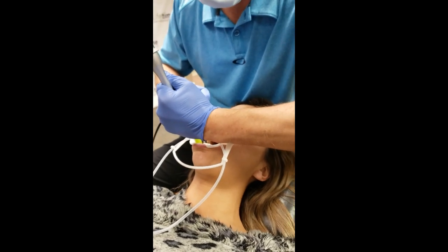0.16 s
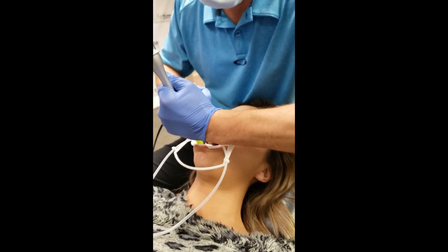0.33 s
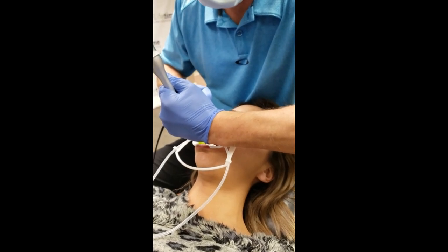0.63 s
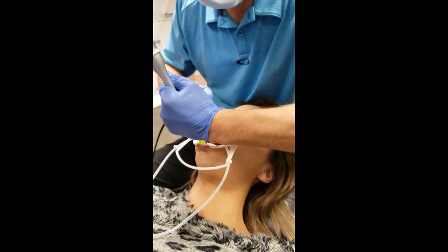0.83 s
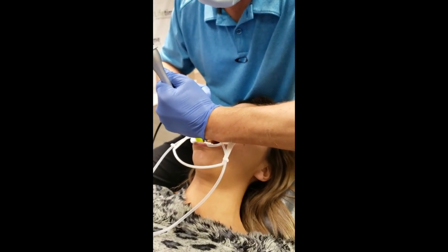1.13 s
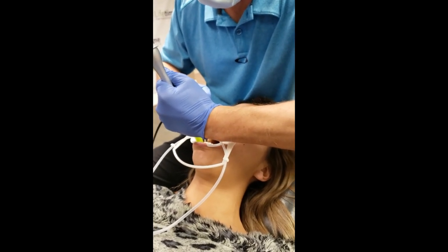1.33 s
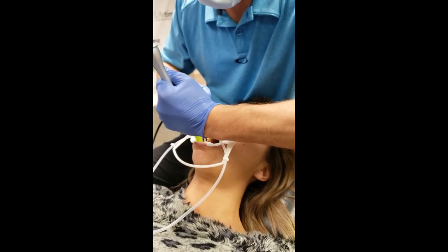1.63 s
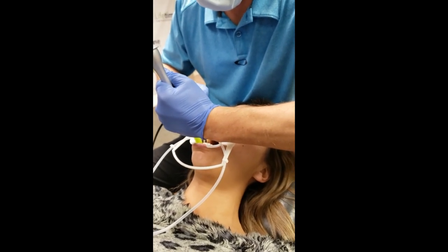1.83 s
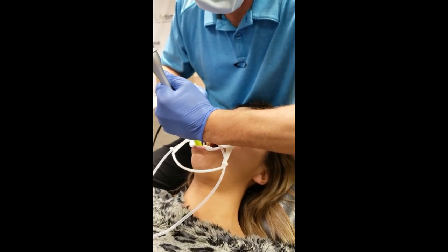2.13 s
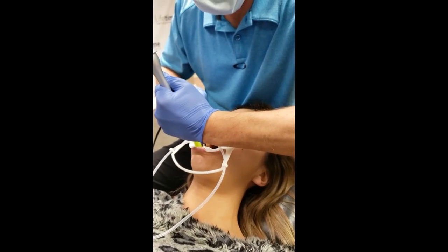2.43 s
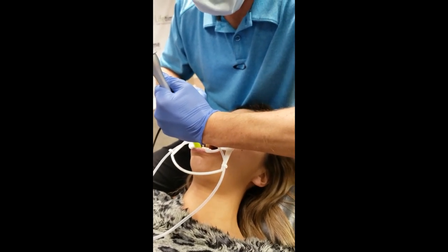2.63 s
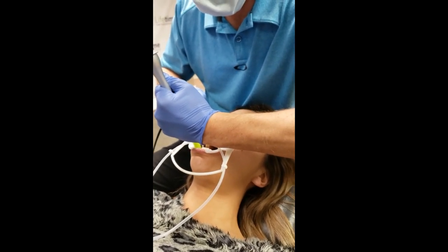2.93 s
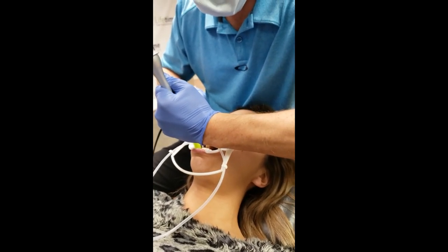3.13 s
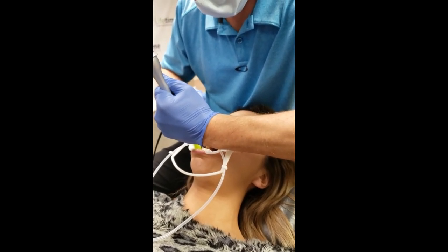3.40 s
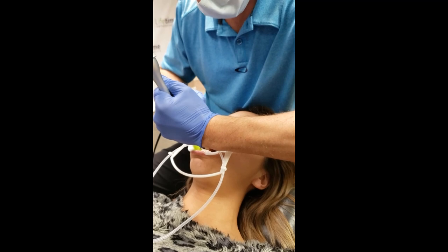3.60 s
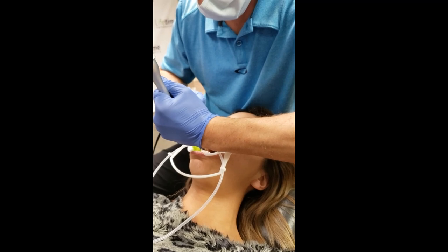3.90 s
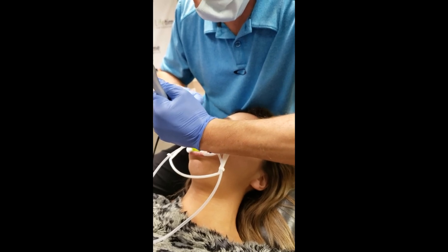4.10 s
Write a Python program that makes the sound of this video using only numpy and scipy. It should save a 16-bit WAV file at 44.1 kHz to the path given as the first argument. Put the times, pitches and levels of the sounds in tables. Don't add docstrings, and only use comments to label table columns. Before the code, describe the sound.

A dental suction hose draws air from a patient's mouth with a thin, bright hiss over a weaker hollow roar. After about a second water reaches the tip and it crackles and spits sharp ticks, busiest around two seconds. Then the jet opens into a stronger, sizzling hiss until the end. Stereo phone at arm's length, with barely audible hand bumps.

```python
import sys
import numpy as np
from scipy import signal
from scipy.fft import rfft, irfft, dct
from scipy.io import wavfile
from scipy.ndimage import uniform_filter1d

SR = 44100
rng = np.random.default_rng(int(sys.argv[2]) if len(sys.argv) > 2 else 0)


def wav_record(signal):
    frames = np.transpose(np.atleast_2d(signal))
    bounded = np.clip(frames, -1, 1)
    quanta = np.round(bounded * 32767).astype(np.int16)
    wavfile.write(sys.argv[1], SR, quanta)


def boost_factor(decibels):
    exponent = np.asarray(decibels, float) / 20
    return 10 ** exponent


N = 187510

# t/s, hose level/dB, tip jet level/dB
AIR_LEVELS = [(0, -38, -29.5), (.5, -37, -30.5), (.6, -34.5, -27.5), (.74, -36, -29), (.89, -38.5, -32),
              (1.24, -37.5, -30.5), (1.29, -36.5, -30.5), (1.6, -36.5, -31), (1.98, -36, -27.5),
              (2.5, -36, -29), (2.64, -35.5, -23.5), (2.87, -38, -25), (2.92, -40, -26), (3.14, -42, -25),
              (3.3, -41, -24.5), (3.86, -41.5, -26.5), (3.96, -42, -24.5), (4.25, -44, -25.5)]
# t/s, share of tip under water/0-1, mouth widened/0-1, crackle spread/dB, small drops/(1/s)
WATER = [
    (0, 0.2, 0.08, 4, 6),
    (.95, 0.02, 0.1, 2, 13),
    (1.15, 0.19, 0.33, 4, 45),
    (1.45, 0.84, 0.3, 4, 55),
    (2.6, 0.88, 0.1, 2, 35),
    (2.66, 0.95, 0.4, 2.5, 5),
    (2.85, 0.92, 0.43, 3, 5),
    (2.9, 0.92, 1, 3, 4),
    (3.5, 0.99, 0.86, 0, 3),
    (4.25, 1, 1, 2, 4),
]
# t/s, peak level/dB
LARGE_DROPS = [(0.6249, -16), (0.9013, -14.5), (1.0839, -24), (1.117, -20), (1.1767, -23), (1.204, -15),
               (1.293, -17), (1.483, -16.5), (1.6324, -15), (1.661, -15), (1.6893, -16), (1.702, -7),
               (1.7295, -18), (1.7809, -16), (1.817, -18), (1.8366, -11), (1.853, -20), (1.8788, -10.5),
               (1.9101, -15), (1.9707, -15), (1.9845, -13), (2.0038, -13.5), (2.0681, -12.5), (2.2226, -6),
               (2.3407, -17), (2.4912, -13.5), (2.5247, -14), (2.554, -14.5), (2.615, -15), (3.2041, -14.5)]
# t/s, jet gain/dB
GULPS_OF_WATER = [
    (1.05, 2.5),
    (1.41, 0),
    (1.99, 1.5),
    (2.165, 1.5),
    (2.21, -2),
    (2.285, 3.5),
    (2.335, 5),
    (2.54, 2.5),
    (2.875, 3),
    (3.58, 2.5),
]
# t/s, peak level/dB
HAND_BUMPS = [(0.614, -53), (0.77, -56), (1.177, -62), (1.43, -57), (1.481, -47), (1.509, -52),
              (1.545, -58), (1.699, -55), (1.97, -58), (2.217, -52.5), (2.545, -60), (2.708, -50),
              (3.412, -57), (3.885, -63), (4.02, -65)]

# f/Hz, width/Hz, left level/dB, right level/dB
HOSE_ROAR = [(182.3, 100, -15, -16.5), (278, 84, -12, -12.5), (415.5, 15, -42.5, -9.5),
             (518.5, 150, -12.5, -10), (838, 460, -9.5, -21), (999, 120, -2.5, -7), (1091, 27, -15, 4),
             (1228, 136, 4, -6), (1384, 550, -15.5, -7), (1639, 17, -0.5, -9.5)]
HOSE_HISS = [(2047, 610, -12, -5), (2384, 450, 0, -5.5), (2880, 370, -3.5, -2), (3488, 270, -2, -3.5),
             (4204, 500, 1, -8), (4875, 550, -10.5, 0), (5462, 290, 4.5, -0.5)]
HOSE_SIZZLE = [(5980, 490, 0.5, -0.5), (6470, 700, 0.5, 2), (6670, 320, -5, 0), (7515, 620, -1, -13)]
DRY_JET = [(8660, 170, -54, 1), (8850, 1100, -4.5, 3), (10400, 790, 0, -18), (10560, 2500, -30.5, -6),
           (11150, 420, -16, 3.5), (11930, 580, -23, 5), (12960, 880, -1, -1), (14800, 350, 2.5, -11),
           (14300, 270, -13, -31)]
WET_JET = [(8170, 500, -13, -16), (8960, 550, -29, -5), (10580, 520, -7.5, -8.5), (11270, 1100, -8, -13),
           (11935, 385, -33, 6), (12470, 840, -17, -23), (12200, 280, -20, 0.5), (13080, 1400, -11.5, -5.5),
           (13930, 810, -15.5, -19)]
RIM_TONE = [(14700, 800, 0, -9), (15300, 800, 1, -6)]

# f/Hz, width/Hz, left depth/dB, right depth/dB
ROOM_DIPS = [(1803, 260, 6.5, 5), (583.4, 100, 3.5, 6.5), (458, 62, 5, 9.5), (4006, 200, 5.5, 6),
             (2850, 220, 5, -0.5), (4800, 340, 1.5, -0.5)]
WIDE_MOUTH_DIPS = [(542, 380, 2.5, 2.5), (1934, 420, 1.8, 4.5), (4970, 300, 8.6, 6), (5570, 290, 11, 11),
                   (3206, 110, 3.8, 7.7), (4090, 200, 2.7, 5), (4510, 120, 2.8, 8.4), (2626, 160, 4.5, 2.9)]
DRY_DIPS = [(8450, 1100, 11.5, 12), (8200, 400, 9.5, 6.2), (15500, 420, -3, 15)]
WET_DIPS = [(7280, 340, -4, 12), (10580, 470, 9.5, 5.5), (9250, 210, 0, -0.5), (8150, 41, 3, -11)]
# f/Hz, level under the loudness of the moment/dB
TOO_FAINT = [(60, -28.5), (500, -18.5), (1800, -17.5), (4000, -14.5), (8000, -14.5), (11000, -13),
             (15000, -10)]


def hose(roar_db, hiss_db, surge):
    roar = unit(ring(air(0.8) * boost_factor(1.3 * walk(7)), HOSE_ROAR))
    waver = boost_factor(1.68 * walk(9.33) + 0.69 * surge)
    hiss = ring(air(0.48) * waver, HOSE_HISS)
    sizzle = ring(air(0.55, sign=-1.28) * waver * boost_factor(0.23 * walk(3)), HOSE_SIZZLE)
    return boost_factor(roar_db + 0.42) * (roar + boost_factor(hiss_db + 0.45) * unit(hiss + sizzle))


def tip(jet_db, rim_db, wet, surge, drops_per_s):
    crackle = boost_factor(0.66 * surge)
    crackle /= np.sqrt(np.mean(crackle ** 2))
    dry_jet = unit(ring(air(0.43, late=1) * crackle, DRY_JET))
    wet_jet = unit(ring(air(0.5, late=1) * crackle, WET_JET))
    jet = np.sqrt(1 - wet) * dry_jet + np.sqrt(wet) * wet_jet
    rim = unit(ring(air(0.98, late=1) * crackle, RIM_TONE))
    rim_share = np.sqrt(wet + 0.25 * (1 - wet))
    torn = torn_drops(drop_kicks(drops_per_s))
    drops = boost_factor(25.5) * ring(torn, WET_JET)
    drops += boost_factor(-2.5) * ring(torn, HOSE_HISS + HOSE_SIZZLE)
    drops += boost_factor(3.5) * ring(torn, RIM_TONE + DRY_JET)
    return boost_factor(jet_db - 1.5) * jet + boost_factor(rim_db + 1.0) * rim_share * rim + drops


def drop_kicks(drops_per_s):
    most_per_s, small_db, spread_db = 80, -20.5, 2.2
    delay_s, large_db = 0.001, -1.5
    gap_s, follower_db = 0.003, -7.5
    when, pick, size = rng.random((int(most_per_s * N / SR), 3)).T
    at = (when * N).astype(int)
    happens = np.clip((drops_per_s[at] / most_per_s - pick) * 10, 0, 1)
    kicks = np.zeros(N)
    kicks[at] = happens * boost_factor(small_db + spread_db * (4 * size - 2))
    start_s, peak_db = np.transpose(LARGE_DROPS)
    gap, size = rng.random((len(start_s), 2, 2)).T
    for k in range(3):
        late_s = delay_s + gap_s * (0.5 + gap[:k]).sum(axis=0)
        level_db = peak_db + large_db + 2 * follower_db * size[:k].sum(axis=0)
        kicks[((start_s + late_s) * SR).astype(int)] = boost_factor(level_db)
    return kicks


def torn_drops(kicks):
    burst_s, tail_s, tail_db = 0.00022, 0.0028, -12
    t = np.arange(int(0.02 * SR)) / SR
    shape = t / burst_s * np.exp(1 - t / burst_s) + boost_factor(tail_db) * np.exp(-t / tail_s)
    puff = signal.fftconvolve(kicks, shape)[:N] * air(0.98)
    tick = np.array([kicks, np.roll(kicks, 1)])
    return tick + boost_factor(-25) * puff


def paths(x, wet, wide):
    flat = [(8000, 1e6, 0, 0)]
    lowest_hz, sway_share, sway_per_s = 130, 0.012, 3
    x = signal.sosfilt(signal.butter(3, lowest_hz, "high", fs=SR, output="sos"), x)
    x = (1 - wet) * ring(x, flat, DRY_DIPS) + wet * ring(x, flat, WET_DIPS)
    up = np.clip(0.5 + 0.36 * walk(sway_per_s), 0, 1)
    out = 0
    for share, sign in ((up, 1), (1 - up, -1)):
        move = [1 + sign * sway_share, 1, 1, 1]
        narrow_mouth = ring(x, flat, np.multiply(ROOM_DIPS, move))
        wide_mouth = ring(x, flat, np.multiply(ROOM_DIPS + WIDE_MOUTH_DIPS, move))
        out = out + share * ((1 - wide) * narrow_mouth + wide * wide_mouth)
    return out


def bumps():
    t = np.arange(N) / SR
    loudness = sum(boost_factor(db) * swell(t, s, rise_s=0.011) for s, db in HAND_BUMPS)
    low_band = signal.butter(2, [45, 117.0], "band", fs=SR, output="sos")
    rumble = unit(signal.sosfilt(low_band, air(0.35)))
    return rumble * loudness * boost_factor([[-2.6], [2.6]])


def air(like, sign=1, late=0):
    shared, left, right = rng.standard_normal((3, N))
    like = np.clip(like, 0, 1)
    together = np.array([sign * shared, np.roll(shared, late)])
    return np.sqrt(like) * together + np.sqrt(1 - like) * np.array([left, right])


def ring(drive, modes, dips=()):
    return signal.fftconvolve(drive, response(modes, dips), axes=1)[:, :N]


def response(modes, dips=(), size=4096):
    hz = np.arange(size // 2 + 1) * SR / size
    f, width, *db = np.transpose(modes)[:, :, None]
    power = np.sum(boost_factor(db) ** 2 / (1 + ((hz - f) / (0.98 * width)) ** 2) ** 2, axis=1)
    cut_db = sum(np.c_[depth_db] / (1 + ((hz - c) / b * 2) ** 4) for c, b, *depth_db in dips)
    cepstrum = irfft(np.log(power) / 2 - cut_db * np.log(10) / 20)
    cepstrum[:, 1:size // 2] *= 2
    cepstrum[:, size // 2 + 1:] = 0
    return irfft(np.exp(rfft(cepstrum)))[:, :size // 2]


def walk(rate):
    k = max(int(SR / rate), 2)
    steps = np.repeat(rng.standard_normal(N // k + 1), k)
    return 0.56 * uniform_filter1d(uniform_filter1d(steps, k), k)[:N]


def swell(t, s, rise_s):
    u = np.maximum(t - s, 0) / rise_s
    return u * np.exp(1 - u)


def unit(x):
    return x / np.sqrt(np.mean(x.mean(axis=0) ** 2))


def scene():
    t = np.arange(N) / SR
    flow_s, *flow = np.transpose(AIR_LEVELS)
    hose_db, jet_db = (np.interp(t, flow_s, c) for c in flow)
    water_s, *water = np.transpose(WATER)
    wet, wide, spread_db, drops_per_s = (np.interp(t, water_s, c) for c in water)
    wet, wide = np.clip([wet, wide], 0, 1)
    gulp_db = sum(db * swell(t, s, rise_s=0.0082) for s, db in GULPS_OF_WATER)
    jet_db = jet_db + gulp_db
    flare_db = 4 * swell(t, 2.6, rise_s=0.13)
    rim_db = jet_db - 12.5 + 5 * wide + flare_db
    hiss_db = 1.5 + 4.5 * wide + 0.42 * gulp_db
    surge = spread_db * (0.5 * walk(25.05) + 0.73 * walk(120) + 0.89 * walk(600))
    mouth = hose(hose_db - 0.33 * gulp_db, hiss_db, surge)
    mouth = mouth + tip(jet_db, rim_db, wet, surge, drops_per_s)
    return paths(mouth, wet, wide) + bumps()


def drop_unheard(x, size=1024):
    near_db, near_hz, patch_db, unsteady_db, top_hz = -6.5, 1500.0, 2.5, 1.8, 15750
    count = N // size + 2
    x = np.pad(x, ((0, 0), (size, (count + 1) * size - N - size))).reshape(2, count + 1, 2, size // 2)
    w = signal.windows.kaiser_bessel_derived(2 * size, 4 * np.pi).reshape(4, -1)
    a, b = x[:, :-1, 0] * w[0], x[:, :-1, 1] * w[1]
    c, d = x[:, 1:, 0] * w[2], x[:, 1:, 1] * w[3]
    folded = np.concatenate([-c[..., ::-1] - d, a - b[..., ::-1]], -1)
    lines = dct(folded, type=4, norm="ortho")
    power = lines ** 2
    hz = (np.arange(size) + 0.5) * SR / 2 / size
    f, under_db = np.transpose(TOO_FAINT)
    faint = boost_factor(np.interp(np.log(hz), np.log(f), under_db))
    whole = np.mean(power, axis=(0, 2))[:, None] * faint ** 2
    near = uniform_filter1d(power, int(near_hz * 2 * size / SR), axis=2) * boost_factor(near_db) ** 2
    swing = np.repeat(rng.standard_normal((1, count, size // 16)), 16, axis=2)
    hidden = (whole + near) * boost_factor(unsteady_db * swing) ** 2
    valley = uniform_filter1d(uniform_filter1d(power, size=9, axis=2), size=2, axis=1)
    patch = valley > hidden * boost_factor(patch_db) ** 2 * np.clip(hz / 2500, 0, 1)
    kept = lines * (power > hidden) * patch * (hz < top_hz)
    u, v = np.split(dct(kept, type=4, norm="ortho"), 2, axis=2)
    head = np.concatenate([v * w[0], -v[..., ::-1] * w[1]], -1)
    tail = np.concatenate([-u[..., ::-1] * w[2], -u * w[3]], -1)
    return (head[:, 1:] + tail[:, :-1]).reshape(2, -1)[:, :N]


def roll_off(x):
    return signal.sosfilt(signal.butter(12, 17070, fs=SR, output="sos"), x)


def record(dry):
    dry = signal.sosfilt(signal.butter(2, 95.0, "high", fs=SR, output="sos"), dry)
    mix = drop_unheard(dry)
    return roll_off(mix)


dry = scene()
out = record(dry)
wav_record(out)
```